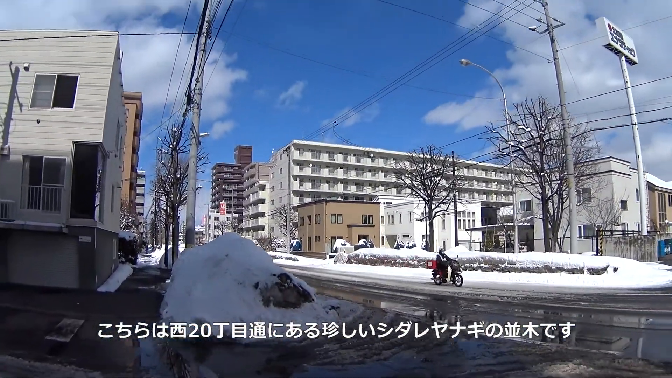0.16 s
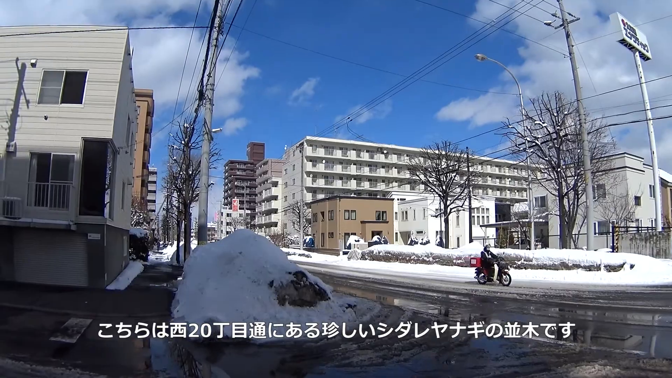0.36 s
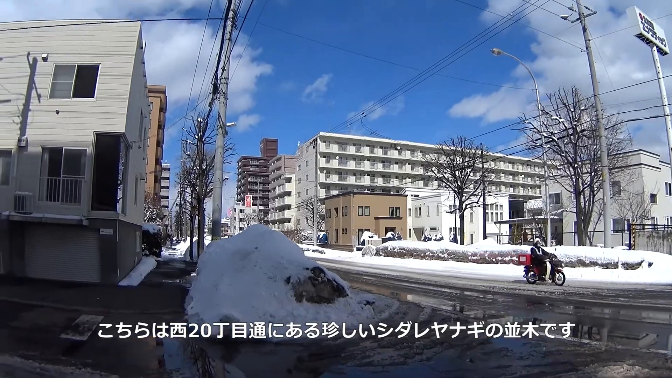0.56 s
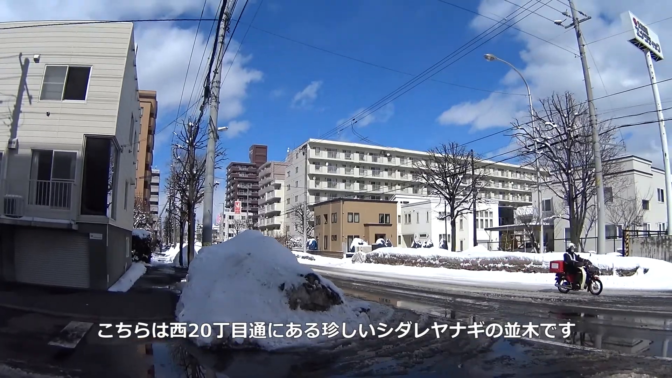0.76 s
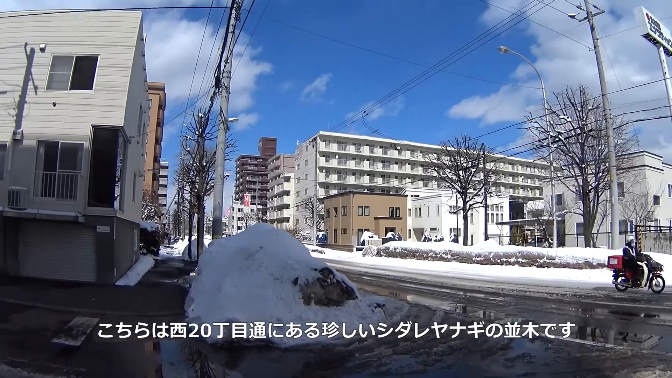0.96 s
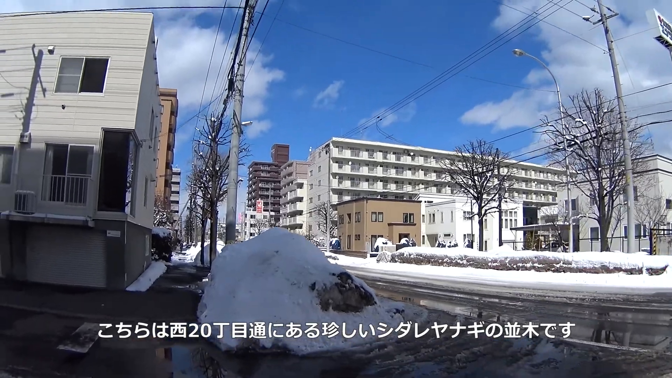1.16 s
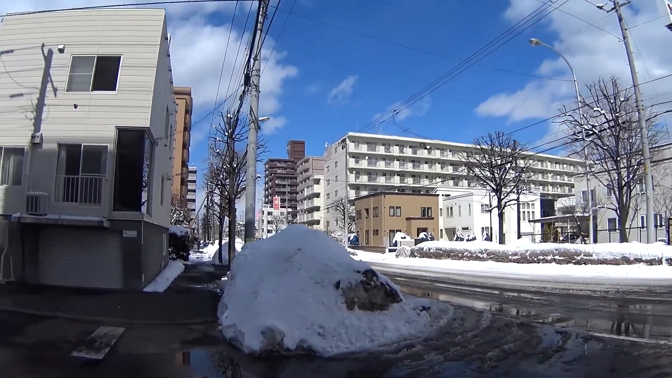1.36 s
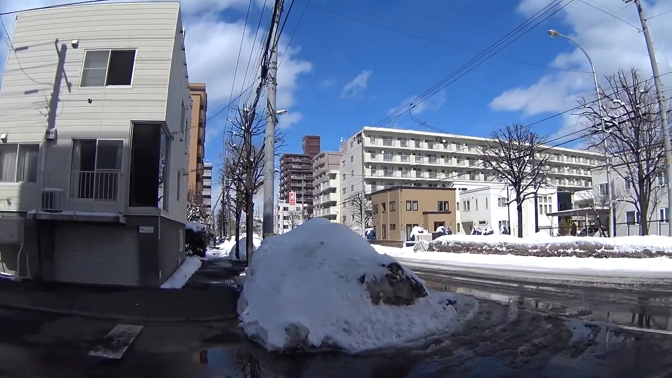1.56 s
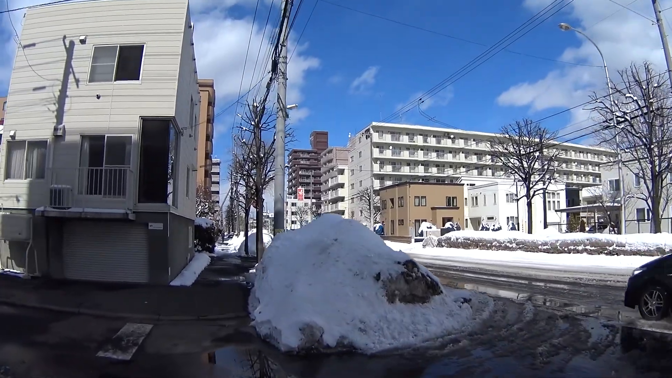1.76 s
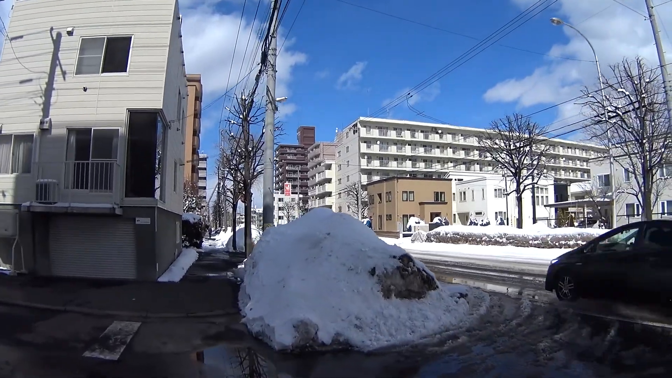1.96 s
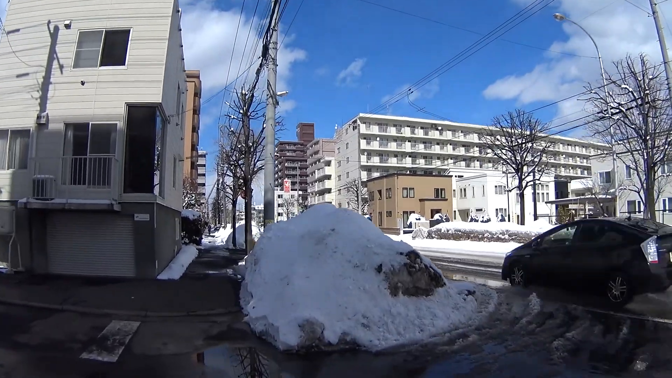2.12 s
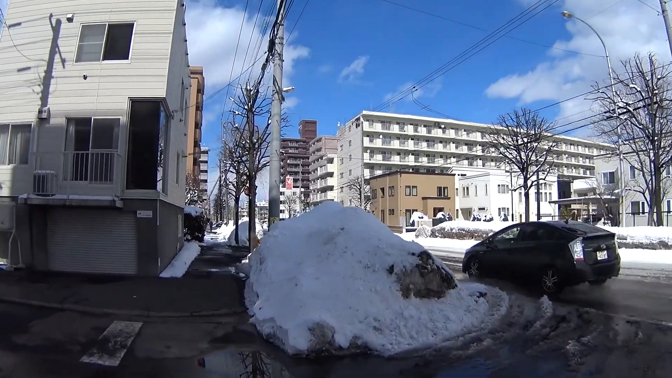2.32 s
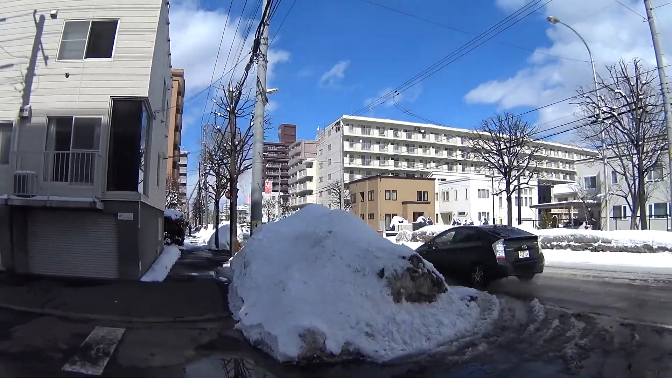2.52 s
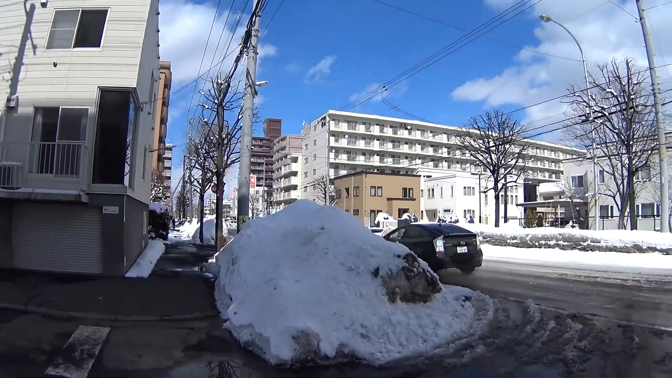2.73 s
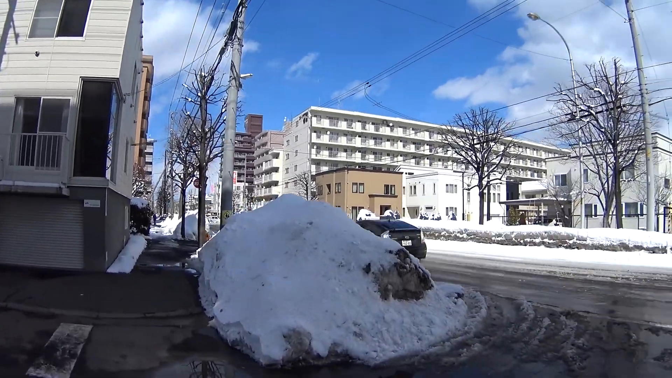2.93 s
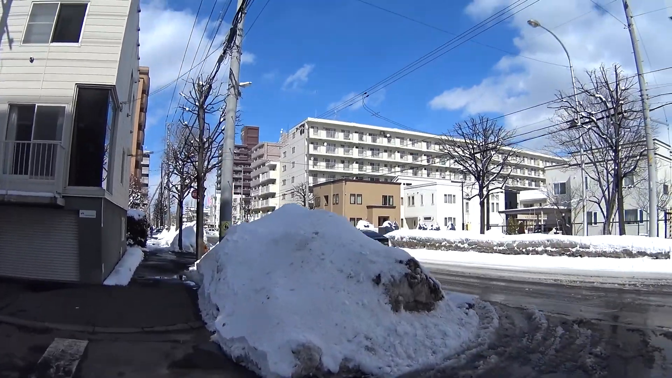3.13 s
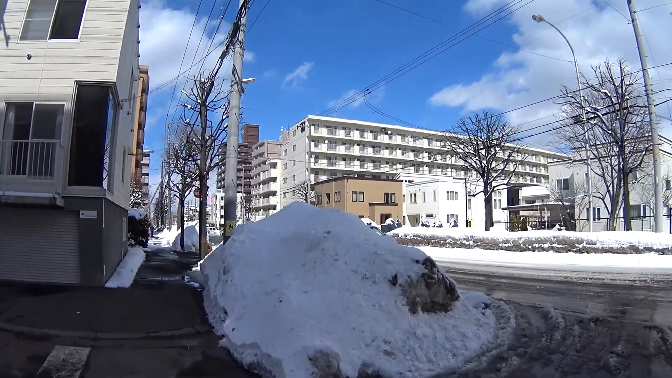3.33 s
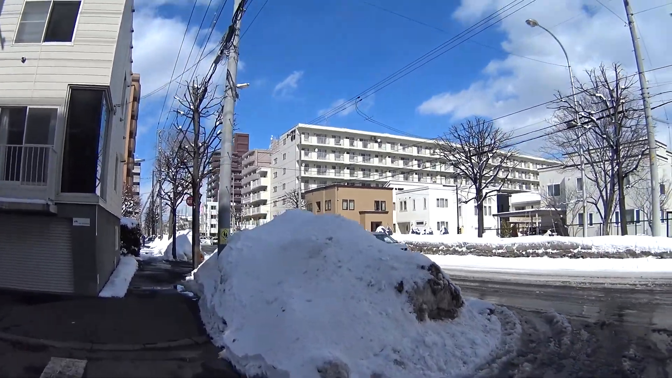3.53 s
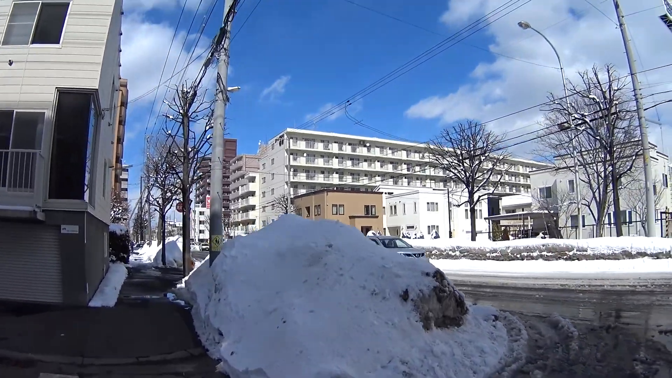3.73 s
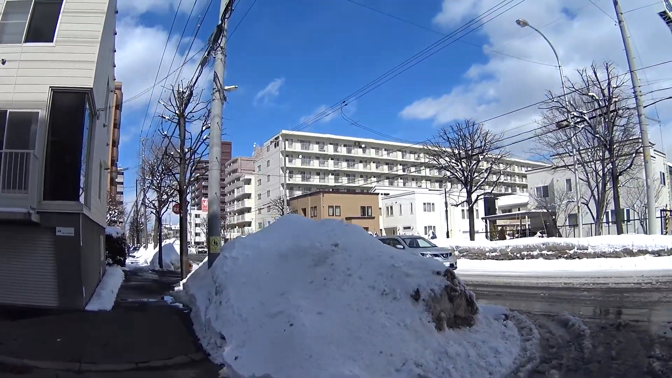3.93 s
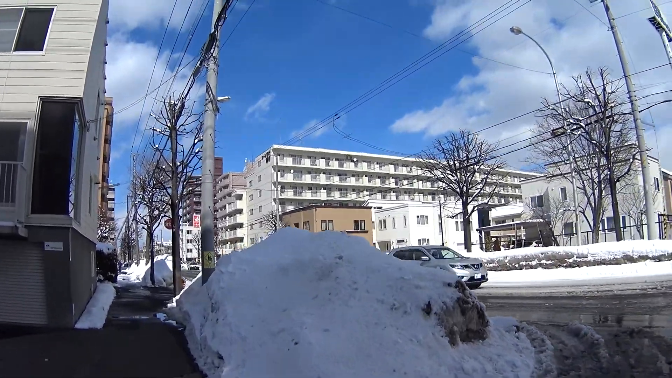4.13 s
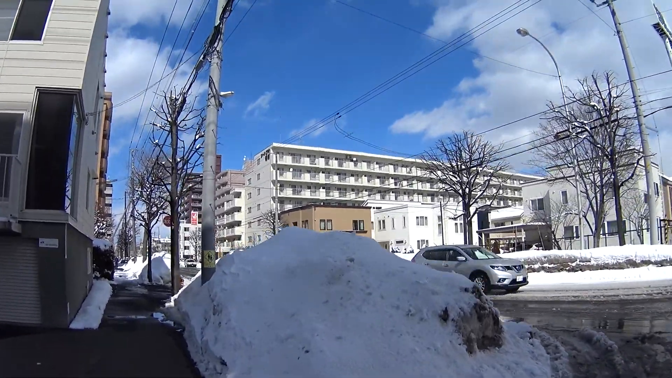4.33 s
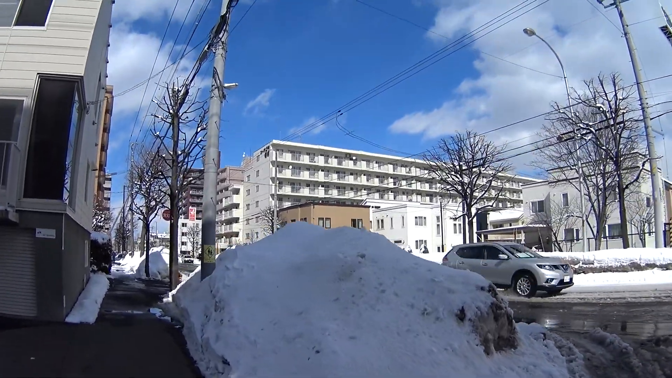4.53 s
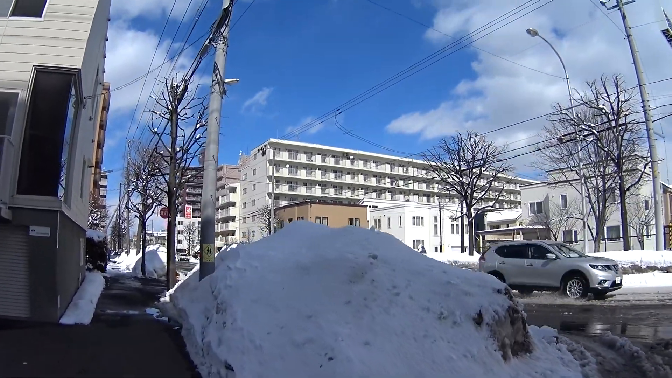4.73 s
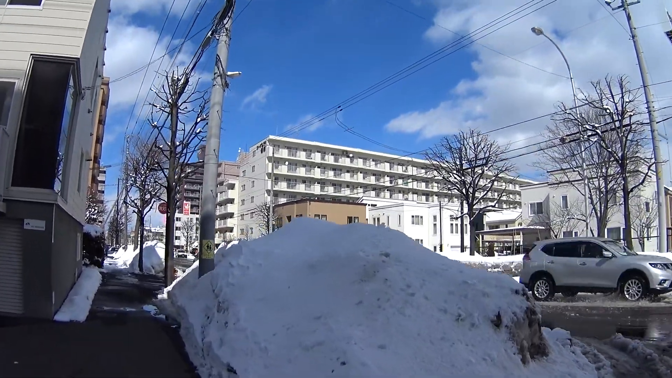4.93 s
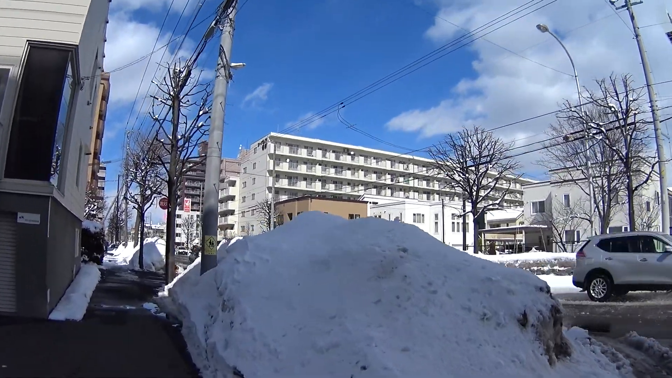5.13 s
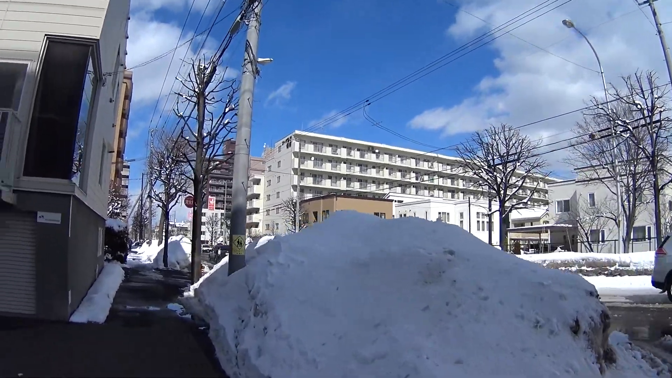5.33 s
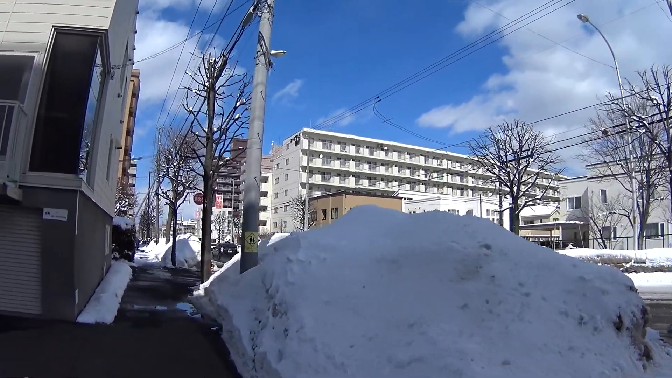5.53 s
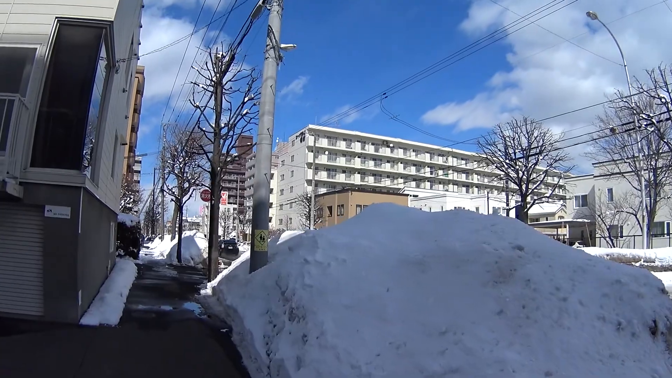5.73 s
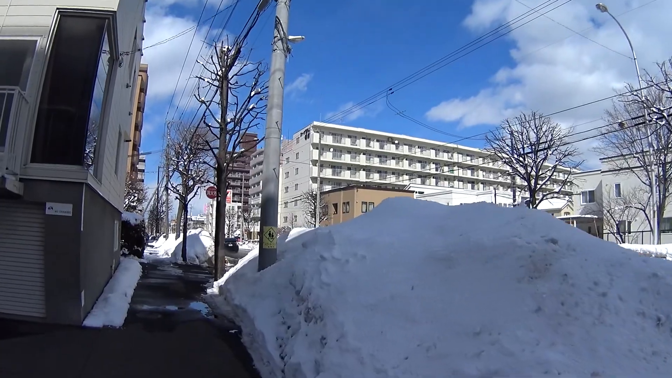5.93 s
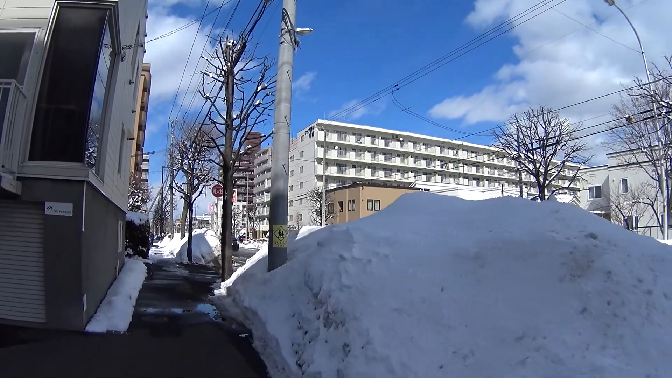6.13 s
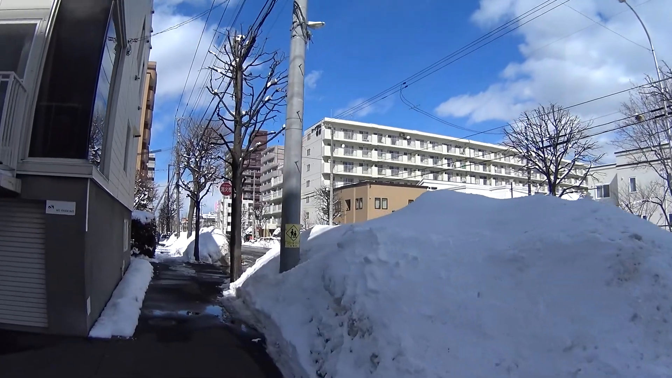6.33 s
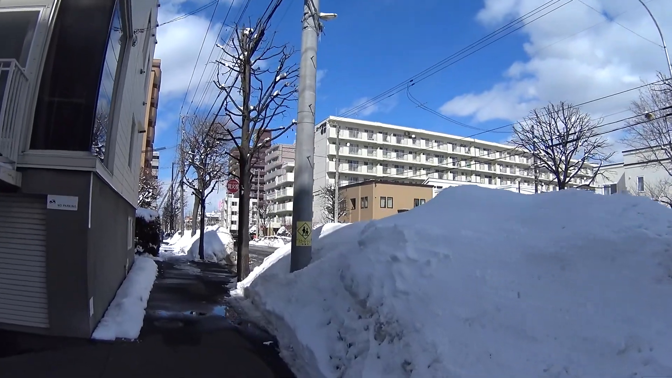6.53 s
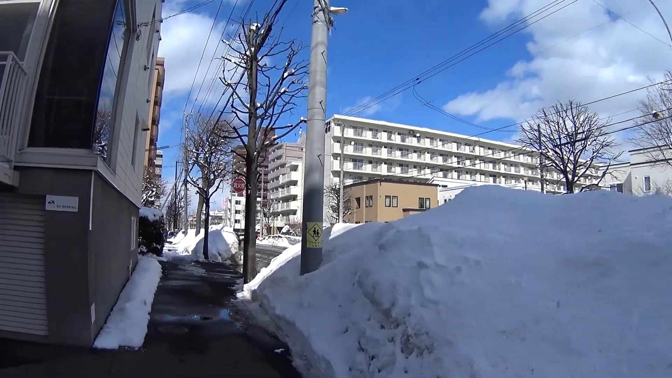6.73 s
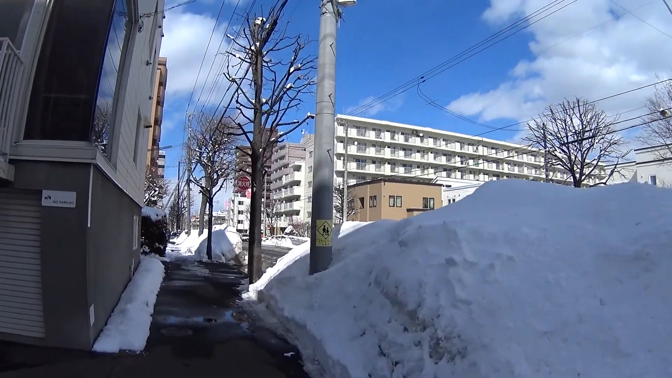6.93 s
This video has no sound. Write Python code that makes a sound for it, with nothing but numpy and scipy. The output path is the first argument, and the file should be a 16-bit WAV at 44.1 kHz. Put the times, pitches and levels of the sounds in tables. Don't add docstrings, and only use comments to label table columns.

```python
import sys
import numpy as np
from scipy import signal
from scipy.fft import rfft, irfft, next_fast_len
from scipy.io import wavfile

SR = 44100
rng = np.random.default_rng(int(sys.argv[2]) if len(sys.argv) > 2 else 0)


def waveform_to_disk(signal):
    frames = np.transpose(np.atleast_2d(signal))
    scaled = np.clip(frames, -1, 1) * 32767
    samples = np.round(scaled).astype(np.int16)
    wavfile.write(sys.argv[1], SR, samples)


def volts(x):
    e = np.asarray(x, float) / 20
    return 10 ** e


N = 307377

# frequency in Hz, level in dB per Hz.
TRAFFIC_COLOUR = [(88, -37), (150, -12), (243, -10), (397, -6.5), (472, -4), (535, -6.5), (1060, -4.5),
                  (1500, -10.5), (1950, -41), (3300, -120)]
# frequency in Hz, level in dB per Hz.
BREEZE_COLOUR = [(8.8, -30), (15, 5.5), (64, -0.5), (161, -13), (184, -23), (260, -29.5), (340, -34),
                 (570, -120)]
# middle in seconds, rise in dB, half length in seconds.
GUSTS = [
    (.22, 8.5, 0.1),
    (.78, 4.5, 0.16),
    (1.3, 2, 0.12),
    (2.9, 1.5, 0.31),
    (4.09, 10, 0.13),
    (4.538, 5, 0.15),
    (5.06, 2.5, 0.13),
    (5.9, 4, 0.51),
    (6.5, 1, 0.3),
]
# time in seconds, level in dB.
FAR_CAR_LEVEL = [
    (0, -82.5),
    (5.2, -99),
    (5.8, -76),
    (6.2, -70),
    (6.5, -72.5),
    (6.97, -68),
]
# frequency in Hz, level in dB per Hz.
FAR_CAR_COLOUR = [(800, -17), (1000, -2.5), (1250, 2.5), (1400, -6), (1600, -19)]
# start in seconds, crunch in dB, length in seconds, bright grit in dB.
STEPS = [(0.13, -68.5, 0.077, -54.5), (0.219, -84, 0.015, -52), (.303, -78, 0.0071, -65),
         (0.5, -77, 0.013, -68), (0.61, -80, 0.022, -50.5), (0.662, -62, 0.035, -51.5),
         (0.726, -68, 0.01, -52.5), (1.085, -70.5, 0.073, -67), (1.115, -84, 0.0088, -46.5),
         (1.267, -72, 0.0086, -47), (1.554, -71, 0.051, -70), (2.05, -67, 0.056, -49),
         (2.605, -79, .03, -53), (3.011, -69.5, 0.033, -50.5), (3.07, -71, 0.039, -56.5),
         (3.2, -70, 0.013, -55), (3.51, -76, 0.045, -56), (4.035, -79, 0.01, -51.5),
         (4.202, -84, 0.0061, -58), (4.542, -75, 0.075, -68), (4.796, -82, 0.0076, -43),
         (5.017, -66, 0.021, -65), (5.51, -71, 0.02, -69), (6.087, -73, 0.02, -69),
         (5.277, -82, 0.039, -50), (5.965, -80, 0.033, -56), (6.182, -74, 0.036, -53),
         (6.398, -72, .04, -67), (6.519, -71, 0.042, -63)]
# frequency in Hz, level in dB per Hz.
CRUNCH_COLOUR = [(250, -30), (340, -10.5), (450, -3.5), (800, -7), (1100, -15), (1600, -17)]
# frequency in Hz, level in dB per Hz.
GRIT_COLOUR = [(1200, -33), (1900, -7), (2600, 4), (3500, -13.5), (5000, -6), (7000, -24.5), (9000, -34),
               (11000, -44)]
# start in seconds, peak in dB, pitch in Hz,
# time to fall 60 dB in seconds, edge in dB against the peak.
JOLTS = [(0.449, -67.5, 61.7, 0.38, -30), (1.152, -64, 71.4, 0.13, -35), (2.337, -55.5, 70.4, 0.069, -24),
         (2.602, -53, 69.5, 0.047, -18), (3.049, -55, 34.5, 0.13, -32), (3.075, -51.5, 91.5, 0.023, -15),
         (3.17, -59.5, 70, 0.047, -22), (3.209, -72, 120, 0.025, -8), (4.078, -57.5, 135, 0.04, -2),
         (4.091, -43.5, 102, 0.03, -14), (4.135, -60, 75, 0.058, -9), (4.148, -55.5, 60.6, 0.059, -11),
         (4.166, -57, 44.6, 0.054, -20), (4.283, -56, 67.4, 0.057, -20), (4.39, -66, 70, 0.12, -27),
         (4.499, -65, 60, 0.11, -26), (4.998, -60.5, 61, 0.13, -22)]
# time in seconds, level in dB, fine mist in dB against the level.
SPRAY_LEVEL = [(0, -59, -16), (.56, -57.5, -14), (1.1, -53, -13.5), (1.3, -48.5, -14), (1.55, -46.5, -15),
               (2.42, -45.5, -14.5), (2.68, -47, -15.5), (2.85, -51.5, -14.5), (3.28, -57.5, -18.5),
               (3.53, -58, -14.5), (3.92, -57.5, -18.5), (4.45, -51.5, -15), (4.85, -49, -15),
               (5.07, -49, -15), (5.32, -48.5, -17), (5.95, -51, -18.5), (6.48, -54.5, -18.5),
               (6.97, -54.5, -19)]
# frequency in Hz, level in dB per Hz.
WET_ROAD_COLOUR = [(530, -51), (900, -23.5), (1060, -29.5), (1240, -16), (1410, -9.5), (1690, -8),
                   (1860, -10), (2170, -3), (2790, 1), (3890, -5.5), (5040, -6.5), (5470, -13.5),
                   (8550, -34.5), (10700, -52), (14000, -58), (22000, -120)]
# time in seconds, amount to the right (0 to 1).
BEARING = [(0, 0.04), (.9, 0.35), (1.2, 0.6), (1.5, 0.72), (2.1, 0.31), (3.0, 0), (4.1, 0), (5.0, 0.39),
           (5.4, 0.68), (5.8, 0.65), (6.2, 0.58), (6.97, 0.5)]
# nearest moment in seconds, peak in dB, rise time in seconds,
# fall time in seconds, moment it goes behind the snow heap in seconds.
PASSES = [
    (.7, -64, .4, 0.23, 1.3),
    (1.38, -55, 0.11, 1.4, 2.95),
    (4.82, -54, 0.089, 0.23, 5.7),
    (5.2, -58.5, 0.5, .8, 7.5),
]
# middle in seconds, half length in seconds,
# roar to the right (1 = far right), front dip filled (1 = fully).
ASIDE = [
    (.4, 0.55, 0.53, 1),
    (6.0, 0.99, 0.23, 1.2),
]
# frequency in Hz, left minus right in dB.
RIGHT_BALANCE = [(100, 6), (300, -1), (700, 3), (1050, 1), (1400, 1), (1850, 0.5), (2300, 2.5),
                 (2800, -2.5), (3300, -7.5), (4500, -4), (5800, 0.5), (7500, -11), (10300, -8)]
# frequency in Hz, lead of the left port in radians.
RIGHT_PHASE = [(0, 0), (600, -0.49), (950, -0.44), (1460, -0.75), (1980, -0.45), (2930, -1.36),
               (3360, 0.23), (4820, -0.13), (5770, -1.23), (6550, -1.9), (7320, -1.1), (8180, -0.4),
               (9040, -1.1), (10400, -0.1)]
# frequency in Hz, level in dB against the middle.
SCATTER = [(30, -28), (100, -24.5), (200, -8.5), (500, -10), (1100, -7), (1700, -13.5), (2400, -18),
           (3000, -12.5), (5000, -16), (8000, -6), (10500, -13)]
# frequency in Hz, width in Hz, gain in dB.
HOUSING = [(2626, 350, 3.5), (1730, 66, 2), (3470, 180, 0), (1006, 150, -2.5)]
# frequency in Hz, width in Hz, share lost (0 to 1).
FRONT_DIP = (2380, 204, 0.46)


def rms_one(x):
    return x / np.sqrt(np.mean(x ** 2) + 1e-20)


def in_time(rows):
    s, *columns = np.transpose(rows)
    return [np.interp(np.arange(N) / SR, s, c) for c in columns]


def at_hz(points, hz):
    at, value = np.transpose(points)
    return np.interp(np.log(hz + 1), np.log(at + 1), value)


def bump(s, half):
    return np.exp(-((np.arange(N) / SR - s) / half) ** 2)


def drift(rate):
    r = np.exp(-80 * np.pi * rate / SR)
    noise = rng.standard_normal(N // 40 + 2002)
    slow = signal.lfilter([1], [1, -2 * r, r * r], noise)[2000:]
    return np.interp(np.arange(N) / 40, np.arange(len(slow)), rms_one(slow))


def droplets(per_s, spread_db):
    sizes = volts(spread_db * np.minimum(rng.exponential(1, N), 3))
    sizes = sizes * rng.choice([-1, 1], N)
    return rms_one(sizes * (rng.random(N) < per_s / SR))


def two_ports(source, spectrum, right, edges, band_db, scatter_db=0):
    size = next_fast_len(N)
    hz = np.arange(size // 2 + 1) * SR / size
    cavity_db = sum(db / (1 + (2 * (hz - at) / width) ** 2) for at, width, db in HOUSING)
    colour = volts(at_hz(spectrum, hz) + cavity_db)
    colour = colour * (hz > spectrum[0][0]) * (hz < spectrum[-1][0])
    mid = rfft(source, size) * colour
    dip_hz, dip_width, dip_share = FRONT_DIP
    lost = np.clip(dip_share, 0, 1) / (1 + (2 * (hz - dip_hz) / dip_width) ** 2)
    ratio = volts(at_hz(RIGHT_BALANCE, hz)) * np.exp(1j * at_hz(RIGHT_PHASE, hz))
    diffuse = rfft(rng.standard_normal(N), size) * colour * volts(at_hz(SCATTER, hz) + scatter_db)
    aimed = mid * (ratio - 1) / (ratio + 1)
    low = hz < dip_hz
    parts = [mid * (1 - lost), mid * lost, aimed * low, aimed * ~low, diffuse]
    ahead, filled, aimed_low, aimed_high, diffuse = irfft(parts, size)[:, :N]
    side = right[0] * aimed_low + right[1] * aimed_high + diffuse
    both = rfft(ahead + right[2] * filled + side * [[1], [-1]], size)
    out = 0
    for k, centre in enumerate(edges):
        share = np.interp(np.log(hz + 1), np.log(edges), np.arange(len(edges)) == k)
        out = out + volts(band_db(centre)) * irfft(share * both, size)[:, :N]
    return out / np.std(ahead)


def aim():
    right, = in_time(BEARING)
    roar = 0.39 + 0.75 * right
    filled = np.clip(5.2 * (right - 0.47), 0, 1)
    for s, half, pull, fill in ASIDE:
        roar = roar + pull * bump(s, half)
        filled = filled + fill * bump(s, half)
    return np.clip([roar, right, filled], -.6, 1.6)


def far_traffic():
    spray_db = in_time(SPRAY_LEVEL)[0]
    far_car_db, = in_time(FAR_CAR_LEVEL)
    near_db = -76.5 + 0.52 * (spray_db + 51) + 6.5 * aim()[0] - 3
    power = volts(-80.5) ** 2 + volts(near_db) ** 2 + volts(far_car_db - 11.5) ** 2
    level_db = 10 * np.log10(power)
    swell = drift(5.4)

    def band_db(hz):
        return level_db + 0.6 * swell + drift(10.0)
    return two_ports(rng.standard_normal(N), TRAFFIC_COLOUR, [.4, 0, 0], [200, 450, 1000], band_db)


def breeze():
    level_db = -71 + sum(rise_db * bump(s, half) for s, rise_db, half in GUSTS)
    gust = drift(11.0)

    def band_db(hz):
        return level_db + 1.6 * gust + 1.2 * drift(7.2)
    return two_ports(rng.standard_normal(N), BREEZE_COLOUR, [0, 0, 0], [30, 60, 120], band_db)


def far_car():
    level_db, = in_time(FAR_CAR_LEVEL)
    noise = rng.standard_normal(N)
    roar = two_ports(noise, FAR_CAR_COLOUR, [1.2, 0, 0], [1200], lambda hz: level_db + drift(4.8))
    return roar * volts([[1.5], [-1.5]])


def steps():
    t = np.arange(round(.3 * SR)) / SR
    dull, bright = np.full(N, 1e-7), np.full(N, 1e-7)
    for s, crunch_db, length, grit_db in STEPS:
        at = round(s * SR)
        x = t / max(length, .004)
        swell = (2 * x * np.exp(1 - 2 * x)) ** 2
        dull[at:at + len(t)] += volts(crunch_db) * swell
        bright[at:at + len(t)] += volts(grit_db) * swell
    slush = droplets(per_s=2800, spread_db=-5.0)
    grains = droplets(per_s=6000, spread_db=-3.0)
    crunch = two_ports(slush, CRUNCH_COLOUR, [0, 0, .5], [600], lambda hz: 0, scatter_db=-7)
    grit = two_ports(grains, GRIT_COLOUR, [0, 0, .5], [3000], lambda hz: 0, scatter_db=2)
    return dull * crunch + bright * grit


def jolts():
    out = np.zeros((2, N))
    t = np.arange(round(.25 * SR)) / SR
    shell_band = signal.butter(3, [90, 300], "band", fs=SR, output="sos")
    shell = rms_one(signal.sosfilt(shell_band, rng.standard_normal(N))) * [[1], [-.4]]
    tick = sum(a * np.sin(2 * np.pi * hz * t) for hz, a in [(400, 1), (640, 0.33), (240, 1.75)])
    tick = tick * volts(-60 * t / 0.013)
    rattle_shape = 0.39 * volts(-60 * t / 0.22) * (1 - np.exp(-t / 0.0031))
    for s, peak_db, hz, t60, edge_db in JOLTS:
        at = round(s * SR)
        swing = 3 * np.sin(2 * np.pi * hz * t) * volts(-60 * t / t60) * (1 - np.exp(-t / 0.0014))
        rattle = shell[:, at:at + len(t)] * rattle_shape
        out[:, at:at + len(t)] += volts(peak_db) * (swing + volts(edge_db) * (2.06 * tick + rattle))
    pan_db = 1.5
    return out * volts([[pan_db / 2], [-pan_db / 2]])


def roar_db():
    heap_db, heap_s, floor_db = -14, 0.16, -74
    t = np.arange(N) / SR
    power = volts(2 * floor_db)
    for s, peak_db, coming, going, hidden in PASSES:
        far = (t - s) / np.where(t < s, coming, going)
        shadow_db = heap_db / (1 + np.exp((hidden - t) / heap_s))
        power = power + volts(2 * (peak_db + shadow_db)) / (1 + far ** 2)
    return 10 * np.log10(power)


def tyres():
    roar_top_hz, bright_foot_hz, mist_foot_hz = 2070, 3450, 5720
    spray_db, mist_db = in_time(SPRAY_LEVEL)
    bright_db = 0.48 * (mist_db + 19.5) - 5.0
    low_db = roar_db() - spray_db
    lumps, surge, wisps = drift(11.3), drift(1.8), drift(14)
    hiss = rng.standard_normal(N)
    source = rms_one(hiss + 0.8 * droplets(per_s=3000, spread_db=3.0))

    def band_db(hz):
        roar = np.clip(np.log2(roar_top_hz * 1.274 / hz) * 4, 0, 1)
        bright = np.clip(np.log2(hz / bright_foot_hz * 1.103) * 4, 0, 1)
        mist = np.clip(np.log2(hz / mist_foot_hz * 1.46) * 1.51, 0, 2.2)
        tilt_db = roar * (low_db + 10.0) + mist * (mist_db + 19.0)
        tilt_db = tilt_db + bright * (1 - min(mist, 1)) * (bright_db + 4.0)
        patch_db = 0.5 * lumps + 0.19 * surge + 0.59 * drift(10.5) + 0.43 * mist * wisps
        return spray_db + 1.1 + tilt_db + patch_db
    return two_ports(source, WET_ROAD_COLOUR, aim(), np.geomspace(1000, 10500, 14), band_db)


def scene():
    return far_traffic() + breeze() + far_car() + steps() + jolts() + tyres()


def roll_off(x):
    return signal.sosfilt(signal.butter(12, 11030, fs=SR, output="sos"), x)


def record(dry):
    return roll_off(dry)


dry = scene()
out = record(dry)
waveform_to_disk(out)
```